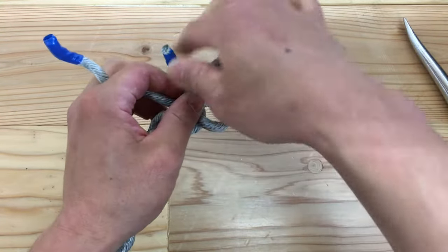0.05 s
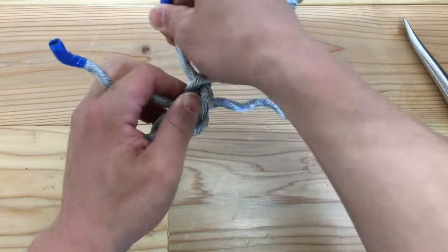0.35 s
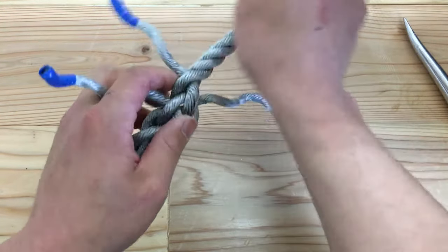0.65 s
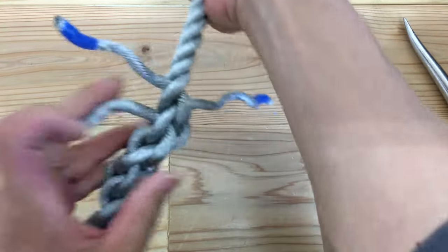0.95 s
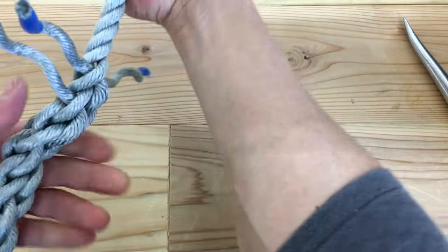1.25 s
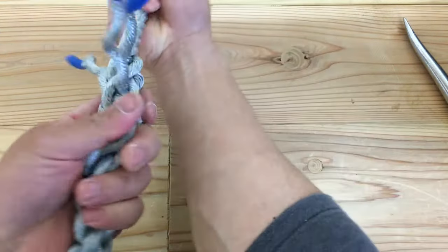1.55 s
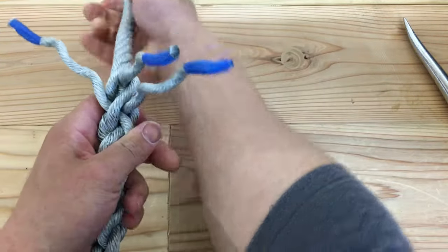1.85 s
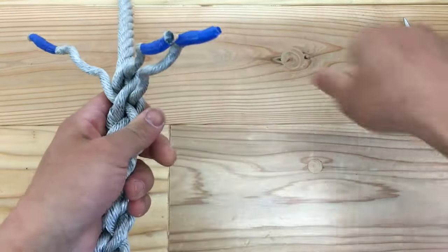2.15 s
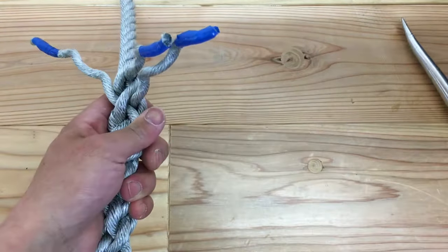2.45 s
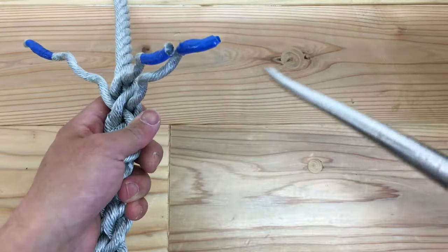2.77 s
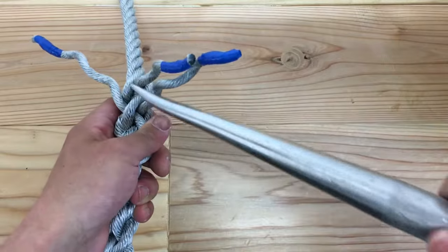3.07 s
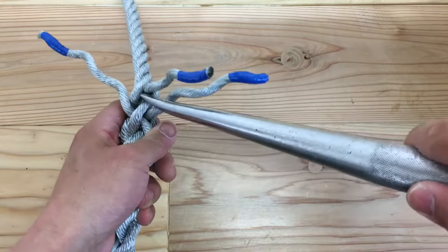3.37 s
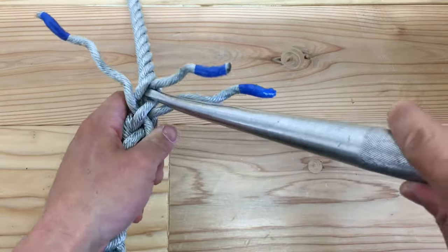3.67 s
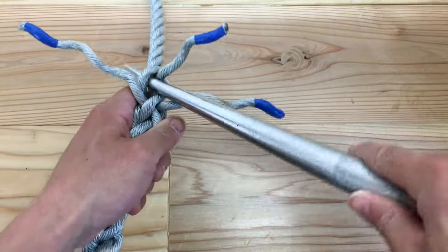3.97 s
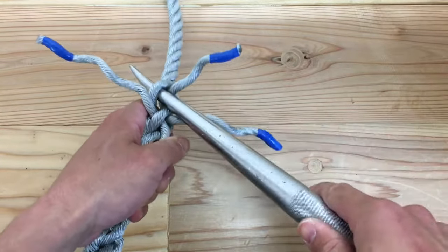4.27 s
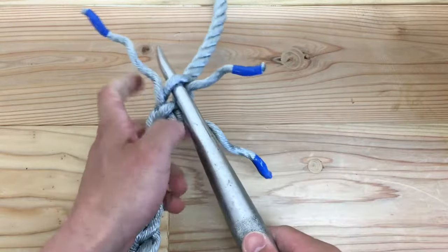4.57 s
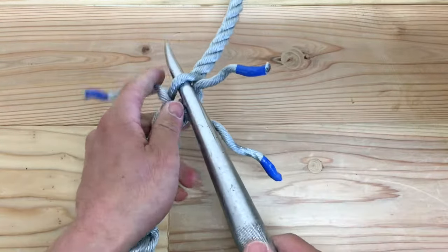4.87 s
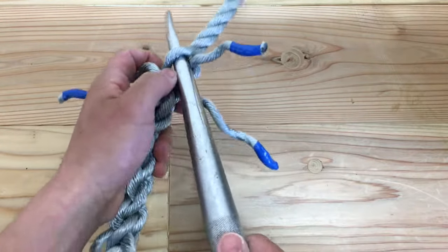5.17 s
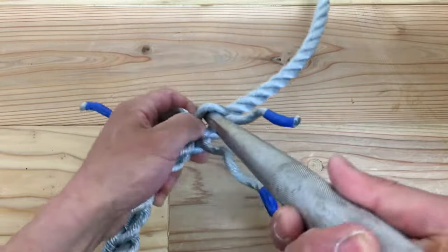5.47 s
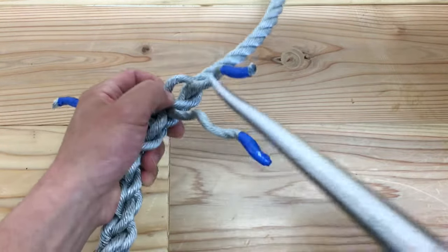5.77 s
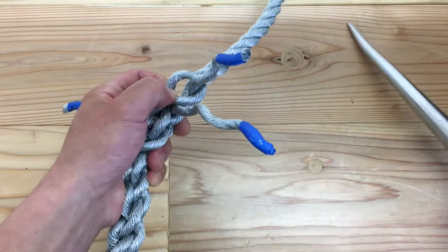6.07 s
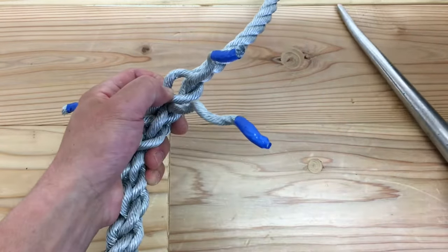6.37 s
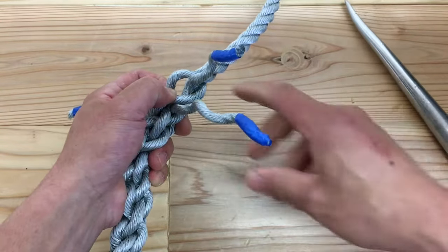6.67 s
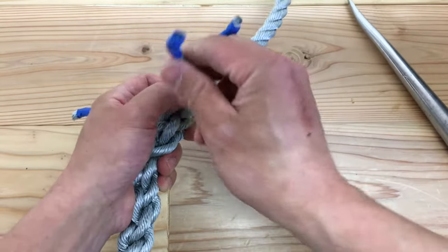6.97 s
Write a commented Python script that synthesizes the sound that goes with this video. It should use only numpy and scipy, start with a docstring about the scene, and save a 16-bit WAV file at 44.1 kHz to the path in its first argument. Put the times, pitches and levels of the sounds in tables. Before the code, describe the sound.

Stiff rope rubs and crackles as hands pull its strands through, bumping a wooden table. A hollow steel spike knocks and rings briefly as it is picked up, then is forced through the tight rope in a run of dull jerks. The spike slides out and is laid down with two knocks. A hand thumps heavily and a strand squeaks. Heard close in a small, hard-walled room over faint rumble and hiss.

```python
"""A small, hard-walled room: a stiff three-strand rope is spliced by hand on a wooden table.
Fibres crackle, rub, snap and squeak as strands are pulled through; the tight lay gives in jerks.
Rope and knuckles bump the boards, and a hand lands heavily. A hollow steel spike knocks, rings
and slides as it is picked up and laid down. Heard close, over faint rumble and hiss."""
import sys
import numpy as np
from scipy import signal
from scipy.fft import rfft, irfft
from scipy.io import wavfile

SR = 44100
rng = np.random.default_rng(int(sys.argv[2]) if len(sys.argv) > 2 else 0)


def wav_out(sig):
    """Save sig, one row per channel (or a flat mono array), as 16-bit PCM at SR to the path in sys.argv[1]."""
    wavfile.write(sys.argv[1], SR, np.round(np.clip(np.atleast_2d(sig).T, -1, 1) * 32767).astype(np.int16))


N = 310023
FFT_SIZE = 65536
FREQ_HZ = np.fft.rfftfreq(FFT_SIZE, 1 / SR)
TIME_S = np.arange(N) / SR

# Hand movements: peak t/s, level/dB, swell/s
STRAND_PULLS = [(0, -67.5, 0.028), (.378, -60.5, 0.013), (.45, -72, .06), (.68, -72, .04), (.84, -77, .05),
                (.99, -73.5, 0.23), (1.38, -74, 0.034), (1.72, -74, 0.047), (1.93, -79.5, .2),
                (2.49, -74.5, 0.11), (3.88, -76.5, 0.085), (4.35, -77.5, 0.66), (4.655, -65.5, 0.052),
                (5.13, -81.5, 0.14), (5.345, -73, 0.032), (5.515, -69, 0.041), (5.68, -78.5, 0.18),
                (6.6, -80.5, 0.27), (6.99, -76, 0.095)]
ROPE_RUBS = [(0, -55, 0.04), (.39, -56.5, 0.025), (.6, -62, 0.54), (.98, -55, .13), (2.15, -68.5, .25),
             (3.38, -69, 0.38), (4.25, -59.5, 0.19), (4.92, -56, 0.42), (5.5, -50.5, 0.085),
             (5.78, -58.5, 0.058), (5.93, -56, 0.023), (6.4, -65, 0.4), (7.02, -54, 0.11)]
STRAND_SQUEAKS = [(6.925, -66.5, 0.008), (6.966, -57.5, 0.0068), (6.995, -61, 0.013)]
SPIKE_SLIDES = [(2.49, -81, .06), (5.77, -71, 0.038), (5.912, -63.5, 0.018), (5.98, -87, 0.054)]
# Fibre snaps: t/s, level/dB, decay/s
FIBRE_SNAPS = [(0.37, -42.5, 0.0066), (1.549, -51, 0.00057), (1.603, -55, 0.0023), (1.651, -55, 0.0022),
               (1.68, -61, 0.0024), (1.712, -44, 0.0033), (3.744, -56, 0.0019), (4.029, -56, 0.0036),
               (5.333, -46, 0.0044), (5.613, -50, 0.0028)]
# Soft blows: t/s, force/dB, contact cut-off/Hz, bass weight/dB, low spot f/Hz, high spot f/Hz,
# tick/dB, room/dB
ROPE_BLOWS = [(.5075, -14.5, 1640, -4, 580, 980, -16, 4), (.654, -16.5, 1310, -1, 520, 1000, -35, 6),
              (.945, -20, 1310, 4.5, 540, 840, -9, 7), (1.714, 6.5, 2640, -5, 880, 1510, -49, 0),
              (3.267, -22, 1250, 7.5, 750, 1070, -28, 0), (5.332, -4, 2250, -1, 1310, 1730, -26, 3.5),
              (5.5, -20.5, 1600, -6, 940, 1260, -13, -5)]
LAY_JERKS = [(3.9925, -23, 1580, -13, 968, 1140, -37, 2.5), (4.1321, -11, 1200, -1.5, 490, 935, -34, 0),
             (4.374, -6, 1840, -7, 700, 1630, -13, 1.5), (4.537, -8.5, 1600, 2, 590, 1490, -19, 1.5),
             (4.6807, -12.5, 1720, -9, 565, 1450, -14.5, 3), (4.82, -11, 1350, -5, 790, 1280, -17, 3.5),
             (4.929, -9.5, 1770, 1.5, 795, 1550, -18, 1.5), (5.055, -12, 1870, 1.5, 1250, 1530, -14.5, 1)]
HAND_BLOWS = [(2.479, -25, 1980, 6, 151, 2020, -31, 6.5), (3.735, -22, 465, 2.5, 282, 600, -26, 2),
              (6.387, -21.5, 390, 4.5, 66, 149, -54, 13.5), (6.5043, 3, 1580, 14, 96, 460, -27, 3.5),
              (6.604, -4.5, 1170, 1, 114, 905, -35, -5), (6.9307, -8.5, 1280, 1, 280, 996, -30, -11),
              (6.982, -19, 490, 13.5, 69, 250, -40, -4)]
# Spike on table: t/s, force/dB, contact cut-off/Hz, bass weight/dB, low spot f/Hz, boost/dB,
# high spot f/Hz, boost/dB, tick/dB, room/dB, wall clack/dB, lengthwise ring/dB
SPIKE_BLOWS = [ (2.567, 8.5, 732, 3, 367, 12, 610, 10.5, -19, -1, 9, -1.5),
               (2.607, -5.5, 950, 4, 318, 18.5, 520, 4.5, -38, 2, 1.5, -20),
               (6.117, 1, 950, 14, 300, 6, 396, 5, -19.5, 1.5, -11, -12.5),
               (6.165, -1.5, 920, 13, 318, 7.5, 477, 0.5, -24, 0.5, -13, -22)]
# Modes: f/Hz, width/Hz, level/dB
STRAND_MODES = [(1078, 44, 32.5), (1230, 99, -4), (2710, 120, 14.5), (6830, 120, 8.5), (11400, 1000, -9)]
SPIKE_WALL_MODES = [(1494, 83, 13), (1610, 80, 4.5), (1662, 33, -3), (1775, 130, 3), (1856, 25, -6),
                    (2340, 45, -13), (2740, 285, -6), (3200, 27, -8.5), (3540, 220, -47), (4400, 120, -16)]
SPIKE_BENDING_MODES = [(2420, 19, 3.5), (4210, 7.1, 0.5), (6550, 9.8, -10), (9050, 37, -19),
                       (12200, 70, -33)]
TABLE_MODES = [(134.4, 50, 5.5), (192.4, 5.7, -2), (254, 18.3, 3), (383, 64, -20), (569, 248, 1.5),
               (892, 82, 4), (1163, 100, 0), (1502, 164, -1.5), (1830, 200, -24.5), (2304, 44, -1.5),
               (2700, 370, -3)]
ROOM_MODES = [(68.45, 2.2, 23.5), (122.5, 4.7, 10), (159, 3.1, -6), (216.3, 1.3, 11.5), (240, 1.1, -12)]
# Spectral shapes: f/Hz, level/dB
FIBRE_SPECTRUM = [(200, -1), (1000, 17.5), (3000, 10.5), (6000, 4.5), (9000, 2.5), (14000, 0.5),
                  (18000, -8)]
RUB_SPECTRUM = [(50, -33), (200, 4.5), (600, 3.5), (1100, 1.5), (2000, -7.5), (3500, -18), (8000, -60.5)]
AIR_SPECTRUM = [(12, -46), (20, -23.5), (59, -2.5), (81, 1), (98, -11.5), (144, -1), (219, -6), (290, -2),
                (465, -17), (687, -13), (768, -15.5), (1040, -16), (2280, -25.5), (2480, -20),
                (15600, -50.5)]
# Room decay: f/Hz, T60/s
ROOM_DECAY = [(80, 0.79), (250, 0.41), (500, 0.59), (1400, 0.96), (3000, 0.6), (6000, 0.9), (14000, 0.19)]
# Microphone port resonances: f/Hz, width/Hz, gain/dB
PORT_BANDS = [(3110, 530, -3), (4220, 730, 5), (4760, 1100, -5.5), (6200, 1300, 2), (7540, 1100, -3),
              (9400, 2300, 1.5), (10350, 260, -6)]


def fibre_crackle(held_db=-85):
    """Fibres slip as strands are pulled; held rope is never quite still."""
    slips = grains(rate_hz=3200, spread_db=1.3)
    return colour(slips, FIBRE_SPECTRUM) * strokes(STRAND_PULLS, held_db)


def rope_rub(held_db=-78, gain_db=-5):
    """Strands rub on skin and on each other."""
    slips = grains(rate_hz=900, spread_db=2.9)
    return colour(slips, RUB_SPECTRUM) * strokes(ROPE_RUBS, held_db) * undb(gain_db)


def fibre_snaps(crest_factor=3):
    """Fibres snap past each other: sudden onset, exponential decay."""
    envelope = sum(undb(db) * (TIME_S >= s) * np.exp(-np.abs(TIME_S - s) / decay_s)
                   for s, db, decay_s in FIBRE_SNAPS)
    slips = grains(rate_hz=13000, spread_db=0.6)
    return colour(slips, FIBRE_SPECTRUM) * envelope / crest_factor


def strand_squeak(gain_db=8):
    """The last strand is drawn through; its slips excite narrow modes."""
    squeak = through(grains(rate_hz=990, spread_db=2.7), modes(STRAND_MODES))
    return squeak / squeak.std() * strokes(STRAND_SQUEAKS) * undb(gain_db)


def rope_bumps():
    """Rope knocks on the boards."""
    return soft_blows(ROPE_BLOWS, low_db=6.8, high_db=3.2, rough_db=-6.5)


def lay_jerks(lead_s=0.008, lead_db=-14):
    """The spike is forced through the lay, which gives a little just before each jerk."""
    leads = [(s - lead_s, db + lead_db, *rest) for s, db, *rest in LAY_JERKS]
    return soft_blows(LAY_JERKS + leads, low_db=6, high_db=1.5, rough_db=2.5)


def hand_thumps():
    """Hand and knuckles land on the table."""
    return soft_blows(HAND_BLOWS, low_db=6.2, high_db=2.3, rough_db=-8)


def spike_knocks():
    """Steel hits wood: the hollow wall clacks, the length rings."""
    clack = modes(SPIKE_WALL_MODES) * resonance(2550, 1340)
    ring = modes(SPIKE_BENDING_MODES) * resonance(4000, 12000)
    return sum(table(s, contact_force(*contact), room_db, undb(clack_db) * clack, undb(ring_db) * ring)
               for s, *contact, room_db, clack_db, ring_db in SPIKE_BLOWS)


def spike_slide(gain_db=-4):
    """Friction on wood or rope drives the spike's bending modes."""
    response = modes(SPIKE_BENDING_MODES) * boost(4195, 600, -7)
    response *= boost(6505, 600, 3.9) * boost(9205, 900, 1.0)
    ring = through(grains(rate_hz=3300, spread_db=1.9), response)
    return ring / ring.std() * strokes(SPIKE_SLIDES) * undb(gain_db)


def soft_blows(rows, low_db, high_db, rough_db):
    """Blows sharing spot boosts and roughness; no steel rings."""
    out = np.zeros((2, N))
    for s, db, contact_hz, weight_db, low_hz, high_hz, tick_db, room_db in rows:
        force = contact_force(db, contact_hz, weight_db, low_hz, low_db, high_hz, high_db,
                              tick_db, rough_db)
        out += table(s, force, room_db)
    return out


def contact_force(db, contact_hz, weight_db, low_hz, low_db, high_hz, high_db, tick_db, rough_db=-9):
    """Spectrum of one blow: soft contact dulls it, weight adds bass, the struck spot resonates."""
    settling = 1 + undb(rough_db) * chatter(decay_s=0.00092) * resonance(1800, 2400)
    tick = undb(tick_db) * chatter(decay_s=0.0013) * lowpass(3300, order=2)
    push = lowpass(contact_hz, order=5) * settling + tick
    weight = 1 + (undb(weight_db) - 1) * lowpass(125, order=1) * (1 + 1.74 * resonance(320, 320))
    spot = boost(low_hz, 0.28 * low_hz, low_db) * boost(high_hz, 0.28 * high_hz, high_db)
    return undb(db) * push * weight * spot


def table(start_s, force, room_db, clack=0, ring=0, echo_s=0.004914, echo_db=-8, radiate_hz=55):
    """Boards radiate one blow, plus any steel spectra. Rows: direct, room feed."""
    board = sum(undb(db) * resonance(hz, width_hz) for hz, width_hz, db in TABLE_MODES)
    flex = resonance(550, 17000)  # many overlapping plank modes
    # Bending waves: treble first, bass later
    dispersion = (1 - 2 * resonance(490, 1200)) * (1 - 2 * resonance(1930, 1400))
    dispersion *= 1 - 2 * resonance(2590, 1500)
    edge_echo = 1 + undb(echo_db) * np.exp(-2j * np.pi * FREQ_HZ * echo_s)
    radiation = (1j * FREQ_HZ / radiate_hz) ** 4 * lowpass(radiate_hz, order=4)  # high-pass
    direct = force * edge_echo * (board + undb(-15) * flex) + dispersion * (clack + ring)
    feed = force * (0.25 * board + undb(-8) * flex) + dispersion * (clack + undb(-2) * ring)
    sound = irfft(radiation * dispersion * np.array([direct, undb(room_db) * feed]))
    out = np.zeros((2, N))
    start = int(start_s * SR)
    out[:, start:start + FFT_SIZE] = sound[:, :N - start]
    return out


def room(x, onset_s=0.001, build_s=0.0041, standing_db=-3, lowest_hz=62.5):
    """Dense reflections build up and decay by octave, over a few standing waves."""
    t = np.arange(FFT_SIZE) / SR
    noise = rfft(rng.standard_normal(FFT_SIZE))
    octave = np.log2(np.clip(FREQ_HZ, lowest_hz, 16000) / lowest_hz)
    tail = np.zeros(FFT_SIZE)
    for k in range(9):
        t60_s = over_hz(ROOM_DECAY, lowest_hz * 2 ** k)
        band = irfft(noise * np.maximum(1 - np.abs(octave - k), 0))
        tail += band * np.exp(-np.log(1000) * t / t60_s)
    tail *= np.clip((t - onset_s) / build_s, 0, 1)
    reflections = rfft(tail) / np.sqrt(np.sum(tail ** 2))
    return through(x, reflections + undb(standing_db) * modes(ROOM_MODES))


def air(level_db=-66):
    """Steady room rumble and hiss."""
    return colour(rng.standard_normal(N), AIR_SPECTRUM) * undb(level_db)


def grains(rate_hz, spread_db):
    """Random slip impulses: many small, few large."""
    size = undb(spread_db * np.minimum(rng.exponential(size=N), 3))
    return (rng.random(N) < rate_hz / SR) * size * rng.choice([-1, 1], N)


def strokes(rows, held_db=-np.inf, release_ratio=0.9):
    """Envelope of movements that swell and fade; powers add."""
    power = undb(held_db) ** 2
    for s, db, swell_s in rows:
        from_peak = np.maximum(s - TIME_S, (TIME_S - s) / release_ratio) / swell_s
        power = power + undb(db) ** 2 * np.exp(-2 * np.minimum(from_peak, 20))
    return np.sqrt(power)


def chatter(decay_s, rise_s=0.003):
    """Spectrum of a unit-energy burst of tiny contacts."""
    t = np.arange(SR // 40) / SR
    burst = rng.standard_normal(len(t)) * np.exp(-t / decay_s) * np.minimum(t / rise_s, 1)
    return rfft(burst, FFT_SIZE) / np.sqrt(np.sum(burst ** 2))


def resonance(hz, width_hz):
    """Band-pass response, gain 1 at centre."""
    return 1j * FREQ_HZ * width_hz / (hz ** 2 - FREQ_HZ ** 2 + 1j * FREQ_HZ * width_hz)


def modes(rows):
    """Response of summed decaying sines."""
    return sum(undb(db) * hz * width_hz / (hz ** 2 - FREQ_HZ ** 2 + 1j * FREQ_HZ * width_hz)
               for hz, width_hz, db in rows)


def boost(hz, width_hz, db):
    """Response lifting or cutting one band."""
    lift = 1 + (undb(abs(db)) - 1) * resonance(hz, width_hz)
    return lift if db > 0 else 1 / lift


def lowpass(hz, order):
    """Maximally flat low-pass response."""
    return signal.freqs(*signal.butter(order, 1, analog=True), FREQ_HZ / hz)[1]


def through(x, response):
    """Filter x by a frequency response."""
    return signal.fftconvolve(x, irfft(response))[:N]


def colour(x, spectrum):
    """Shape x by a spectrum; rms 1."""
    gain = undb(over_hz(spectrum, np.fft.rfftfreq(N, 1 / SR)))
    shaped = irfft(rfft(x) * gain, N)
    return shaped / shaped.std()


def over_hz(rows, hz):
    """Interpolate (f/Hz, value) rows over log frequency."""
    row_hz, value = np.transpose(rows)
    return np.interp(np.log(hz + 1), np.log(row_hz), value)


def undb(db):
    """dB to gain."""
    return 10 ** (np.asarray(db) / 20)


def scene(handling_room_db=-3):
    """Rope, spike and table, direct and off the walls; mono."""
    blows, room_feed = rope_bumps() + lay_jerks() + hand_thumps() + spike_knocks()
    handling = fibre_crackle() + rope_rub() + fibre_snaps() + strand_squeak() + spike_slide()
    reverb = room(room_feed + undb(handling_room_db) * handling)
    return (blows + handling + reverb + air())[None]


def record(dry):
    """Phone microphone: the port colours the treble; deep bass and top are cut."""
    low_cut_hz, high_cut_hz = 35, 15650
    port = np.prod([boost(*band) for band in PORT_BANDS], axis=0)
    coloured = through(dry[0], port)[None]
    thinned = signal.sosfilt(signal.butter(2, low_cut_hz, "high", fs=SR, output="sos"), coloured)
    return signal.sosfilt(signal.ellip(10, .2, 70, high_cut_hz, fs=SR, output="sos"), thinned)


dry = scene()
out = record(dry)
wav_out(out)
```